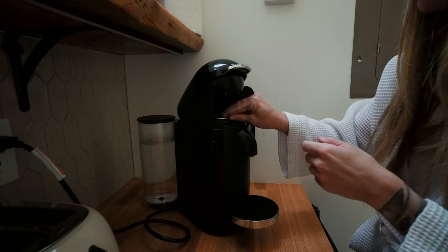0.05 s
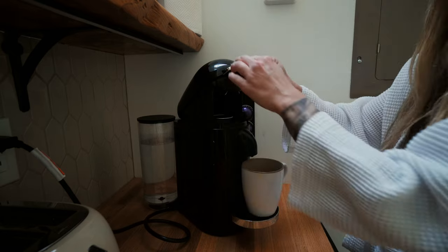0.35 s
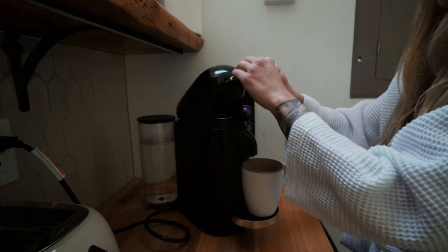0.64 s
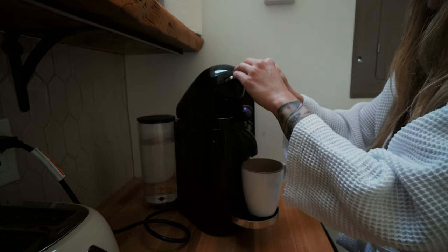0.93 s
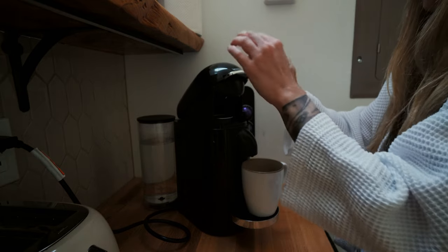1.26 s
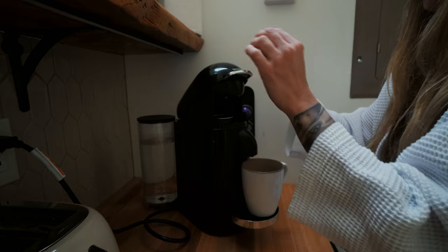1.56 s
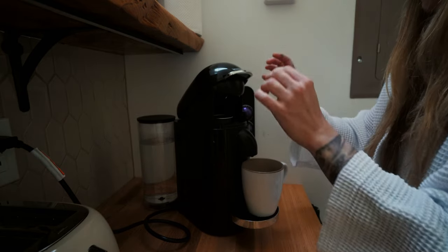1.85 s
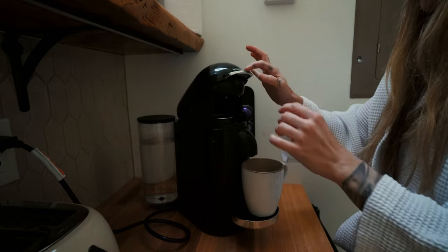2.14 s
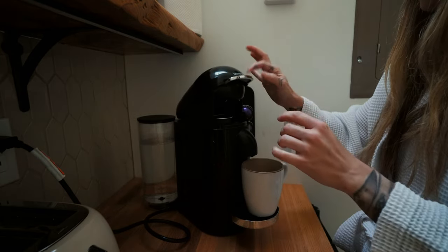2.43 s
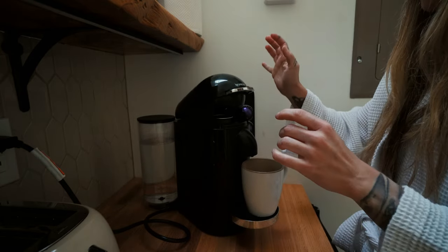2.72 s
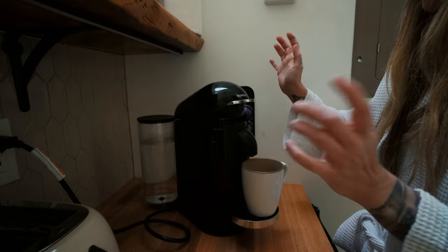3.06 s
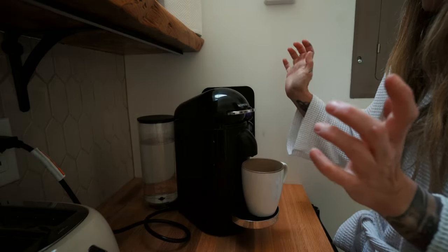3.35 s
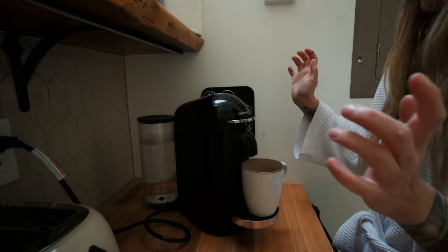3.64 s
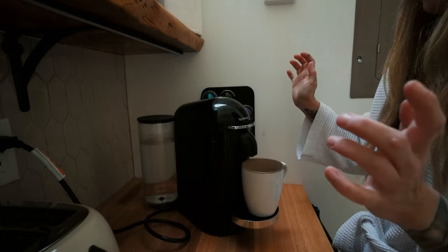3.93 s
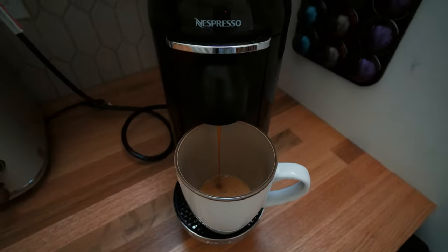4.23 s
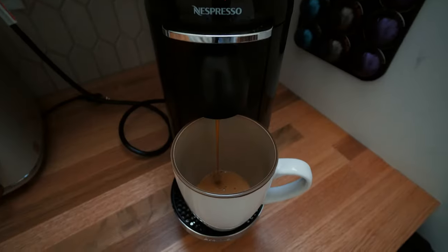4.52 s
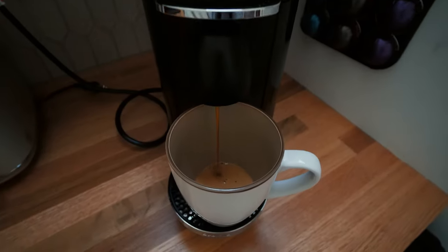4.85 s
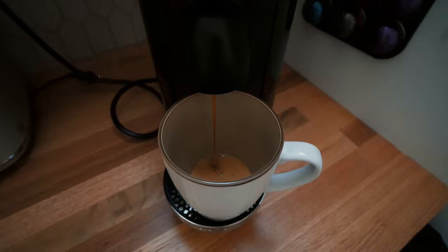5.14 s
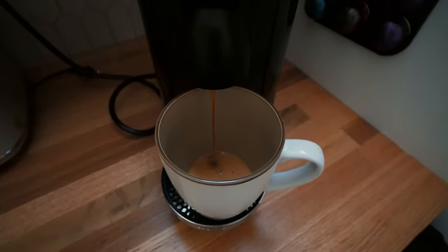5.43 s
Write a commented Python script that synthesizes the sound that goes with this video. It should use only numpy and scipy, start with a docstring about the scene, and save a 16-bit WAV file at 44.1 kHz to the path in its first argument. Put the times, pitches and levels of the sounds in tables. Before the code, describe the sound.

At the start a hollow plastic bin bumps and briefly slides into a capsule coffee machine in a small, slightly echoing kitchen. From 0.4 to 1.1 seconds a sprung lever clicks several times, with dull knocks and two short, soft motor whirs. Faint room noise follows until about 2.3 seconds, when more clicks and knocks start a small gear motor. It whirs and rasps until 3.9 seconds, with light ticks and a thin falling whine. Three sharp plastic latch snaps, the loudest sounds, land at about 3.1, 3.6 and 3.9 seconds, the second with a chattering, ringing spring. At about 4.2 seconds the sound cuts abruptly to close by the spout. The spinning capsule whines at a steady pitch over the hiss of brewing coffee and a faint pump buzz. Tiny drops tick, with larger spits around 5 and 5.3 seconds, and the brewing continues to the end, near 5.7 seconds.

```python
"""A plastic bin bumps and slides into a capsule coffee machine on a small kitchen's wooden counter.
A sprung lever clicks, and head and lever knock dully; a gear motor draws the head shut
and the latches snap home, one with a ringing spring. Then a cut to close by the spout:
the spinning capsule whines over the hiss of the brew, spitting drops and a buzzing pump."""
import sys
import numpy as np
from scipy import signal
from scipy.fft import irfft, next_fast_len
from scipy.io import wavfile
from scipy.ndimage import map_coordinates

SR = 44100
rng = np.random.default_rng(int(sys.argv[2]) if len(sys.argv) > 2 else 0)


def transcribe(u):
    """Save the signal u as a 16-bit wav file named by the first command-line argument.

    u: samples, shape (n,) or (channels, n), limited to [-1, 1]; the rate is SR.
    q: integer samples, one column per channel.
    """
    v = np.clip(np.atleast_2d(u).T, -1, 1)
    q = np.round(v * 32767).astype(np.int16)
    wavfile.write(sys.argv[1], SR, q)


N = 250488
TIME = np.arange(N) / SR
HIT_TIME = TIME[:SR // 2]
FREQS = np.maximum(np.fft.rfftfreq(N, 1 / SR), 1)
COUNTER_HZ = 224.6   # lowest mode of the wood
MOTOR_RELEASE_DB_PER_S, GEAR_RELEASE_DB_PER_S = 110, 193
BREW_START_S = 4.157


def from_db(db):
    """Decibels to gain."""
    return 10 ** (np.asarray(db) / 20)


def rms_one(x):
    """Scale to unit rms."""
    return x / np.sqrt(np.mean(x ** 2) + 1e-20)


def at_hz(points, hz=FREQS):
    """Interpolate a table over log frequency."""
    points_hz, values = np.transpose(points)
    return np.interp(np.log(hz), np.log(points_hz), values)


def colour(points):
    """Broad spectrum of unit power, rolled off below its first point."""
    return rms_one(from_db(at_hz(points)) * np.minimum(FREQS / points[0][0], 1) ** 2)


def resonances(modes):
    """Steep-sided peaks as a spectrum of unit power."""
    power = sum(from_db(db) ** 2 / (1 + ((FREQS - hz) / width) ** 2) ** 2 for hz, width, db in modes)
    return rms_one(np.sqrt(power))


def tilt(db_per_oct):
    """Spectral tilt about 1600 Hz, flat below 400 Hz."""
    return from_db(db_per_oct * np.log2(np.maximum(FREQS, 400) / 1600))


def rippled(shape, ripple_db, spacing_hz):
    """Many small resonances ripple a spectrum."""
    ripple = map_coordinates(rng.standard_normal(2000), [FREQS / spacing_hz], order=2, mode="wrap")
    return rms_one(shape * from_db(ripple_db * ripple * np.minimum(FREQS / 1500, 1)))


def drift(rate_hz):
    """Smooth random curve, spread about 1."""
    knots = rng.standard_normal(N // 20)
    return map_coordinates(knots, [TIME * rate_hz + 10], order=2, mode="wrap")


def tone(hz):
    """Unit-rms sine on a pitch curve, random phase."""
    cycles = np.cumsum(hz * np.ones(N)) / SR
    return np.sqrt(2) * np.sin(2 * np.pi * (cycles + rng.random()))


def gate(start_s, stop_s, release_db_per_s, swell_db_per_s=0, attack_s=0.024):
    """Envelope of a moving part: attack, sloping hold, release."""
    attack = np.clip((TIME - start_s) / attack_s, 0, 1)
    held_db = swell_db_per_s * np.clip(TIME - start_s, 0, stop_s - start_s)
    return attack * from_db(held_db - release_db_per_s * np.maximum(TIME - stop_s, 0))


def add(out, time_s, sound):
    """Mix a sound in at time_s."""
    start = max(round(time_s * SR), 0)
    out[:, start:start + sound.shape[-1]] += sound[..., :N - start]


# stereo width at the counter (frequency [Hz], side re mid [dB])
FAR_WIDTH = [(60, -54), (380, -22.5), (2380, -12), (15000, -2.5)]
def noise(shape, width=FAR_WIDTH, size=N):
    """Shaped stereo noise, mid at unit rms."""
    padded = next_fast_len(size)
    hz = np.maximum(np.fft.rfftfreq(padded, 1 / SR), 1)
    mid, side = np.exp(2j * np.pi * rng.random((2, len(hz)))) * np.interp(hz, FREQS, shape)
    stereo = irfft(mid + side * from_db(at_hz(width, hz)) * [[1], [-1]], padded)[:, :size]
    return stereo / np.std(stereo.mean(axis=0))


def strike(shape, t60_s, rise_s, tilt_db_per_oct=0, low_hz=130):
    """A struck part, too small to radiate bass: dense modes rise and die together."""
    ring = noise(shape * tilt(tilt_db_per_oct), size=len(HIT_TIME))
    envelope = (1 - np.exp(-HIT_TIME / rise_s)) * from_db(-60 * HIT_TIME / t60_s)
    highpass = signal.butter(2, low_hz, "high", fs=SR, output="sos")
    return rms_one(signal.sosfilt(highpass, ring * envelope)) * np.sqrt(np.mean(envelope ** 2))


# kitchen background (frequency [Hz], level [dB])
ROOM_SPECTRUM = [(55, -24.5), (130, -33.5), (280, -22.5), (550, -8), (1050, -11.5), (2130, -16.5),
                 (6000, -38.5), (15000, -49.5)]
def room_tone(level_db=-60.5):
    """Faint, steady room noise."""
    return from_db(level_db) * noise(colour(ROOM_SPECTRUM))


# kitchen decay (frequency [Hz], T60 [s])
ROOM_DECAY = [(200, 0.7), (15000, 0.43)]
def kitchen_reverb(dry, wet_db=-8, onset_s=0.0061, early_db=6, early_s=0.0096):
    """Diffuse reflections from tiles and shelf; treble dies first."""
    t = TIME[:SR * 3 // 4]
    edges_hz = np.geomspace(100, 17000, 9)
    tail = 0
    for low, high in zip(edges_hz, edges_hz[1:]):
        bandpass = signal.butter(2, [low, high], "band", fs=SR, output="sos")
        band = signal.sosfilt(bandpass, noise(np.ones(len(FREQS)), size=len(t)))
        tail += band * from_db(-60 * t / at_hz(ROOM_DECAY, np.sqrt(low * high)))
    tail *= 1 + from_db(early_db) * np.exp(-t / early_s)   # near corner
    tail = rms_one(tail * np.minimum(t / onset_s, 1) ** 2) / np.sqrt(len(t))
    return dry + from_db(wet_db) * signal.fftconvolve(dry, tail, axes=1)[:, :N]


def motor_strain(start_s=2.96, stop_s=3.27, level_db=-62.5, width_hz=18):
    """The loaded motor shakes the counter at its lowest mode."""
    hum = noise(resonances([(COUNTER_HZ, width_hz, 0)]))
    return from_db(level_db) * gate(start_s, stop_s, MOTOR_RELEASE_DB_PER_S) * hum


# motor whine (time [s], pitch [Hz], level [dB])
WHINE_PATH = [(3.19, 7150, -68), (3.29, 6730, -63), (3.385, 6540, -58.5), (3.46, 6210, -66),
              (3.57, 5720, -65), (3.635, 5470, -67)]
def motor_whine(voices=10, smear_hz=210):
    """A thin, smeared whine sinks as the head presses home."""
    times_s, pitches_hz, levels_db = np.transpose(WHINE_PATH)
    hz = np.interp(TIME, times_s, pitches_hz)
    level = from_db(np.interp(TIME, times_s, levels_db))
    whine = rms_one(sum(drift(smear_hz) * tone(hz) for _ in range(voices)))
    return level * gate(times_s[0], times_s[-1], GEAR_RELEASE_DB_PER_S) * whine


# gear stages (start [s], stop [s], pitch [Hz], level [dB])
MESH_TONES = [(2.545, 2.74, 925, -47.5), (2.54, 3.06, 1975, -52), (2.78, 2.96, 638, -56),
              (2.8, 2.97, 885, -53), (2.909, 3.053, 2605, -55), (3.05, 3.12, 3830, -55)]
def gear_mesh(sag_per_s=0.13, jitter=0.009, flutter_db=3.1):
    """Meshing teeth sing unsteadily and sag as the motor slows."""
    out = 0
    for start_s, stop_s, hz, db in MESH_TONES:
        speed = np.exp(-sag_per_s * np.maximum(TIME - start_s, 0)) * (1 + jitter * drift(240))
        level = from_db(db + flutter_db * drift(110)) * gate(start_s, stop_s, GEAR_RELEASE_DB_PER_S)
        out += level * tone(hz * speed)
    return out


# tooth resonances (frequency [Hz], width [Hz], level [dB])
TOOTH_MODES = [(952, 20, 4), (1950, 140, -2), (2360, 460, 0.5), (2656, 60, 4.5), (3220, 85, -2.5)]
# gears under load (start [s], stop [s], initial level [dB])
GEAR_LOADS = [(0.474, 0.67, -49), (2.376, 2.517, -50), (2.53, 2.739, -46.5)]
def gear_rasp(motor_level, idle_db=-12, swell_db_per_s=13.5, grain_db=3):
    """Plastic teeth rasp, faintly when idle, harder as they carry the head."""
    loaded = sum(from_db(db) * gate(start_s, stop_s, GEAR_RELEASE_DB_PER_S, swell_db_per_s)
                 for start_s, stop_s, db in GEAR_LOADS)
    rasp = np.hypot(loaded, from_db(idle_db) * motor_level) * noise(resonances(TOOTH_MODES))
    return from_db(grain_db * drift(300)) * rasp


# motor whir (frequency [Hz], level [dB])
WHIR_SPECTRUM = [(200, -37), (330, -13.5), (750, -2.5), (1400, -6), (3500, -14.5), (4700, -19),
                 (15000, -50.5)]
# gearbox resonances (frequency [Hz], width [Hz], level [dB])
GEARBOX_PEAKS = [(221, 14, -4), (626, 16.6, 9.5), (3740, 200, -1.5), (7500, 410, -16.5), (8300, 220, -14),
                 (9930, 1030, -21)]
# motor runs (start [s], stop [s], initial level [dB], swell [dB/s], tilt [dB/oct])
MOTOR_RUNS = [(0.471, 0.762, -48.5, -4, 0), (0.858, 1.092, -53.5, 12, -0.5), (2.367, 2.494, -50.5, 25, -1),
              (2.512, 3.18, -47, 0, .5), (3.21, 3.632, -47.5, -10.5, 1), (3.784, 3.894, -39, -12, 3)]
def head_drive(gearbox_db=-8):
    """A small motor whirs through its gearbox and drives the head shut."""
    casing = np.hypot(colour(WHIR_SPECTRUM), from_db(gearbox_db) * resonances(GEARBOX_PEAKS))
    casing = rippled(casing, ripple_db=1.6, spacing_hz=123.3)
    whir, motor_level = 0, 0
    for start_s, stop_s, db, swell_db_per_s, db_per_oct in MOTOR_RUNS:
        level = from_db(db) * gate(start_s, stop_s, MOTOR_RELEASE_DB_PER_S, swell_db_per_s)
        whir += level * noise(casing * tilt(db_per_oct))
        motor_level = np.hypot(motor_level, level)
    return whir + gear_rasp(motor_level) + gear_mesh() + motor_whine() + motor_strain()


# plastic friction (frequency [Hz], level [dB])
RUB_SPECTRUM = [(150, -31.5), (380, -12), (720, -1), (1020, -6), (2800, -14), (3450, -10), (4200, -23),
                (15000, -39.5)]
# bin cavity (frequency [Hz], width [Hz], level [dB])
CAVITY_MODES = [(1328, 89, 4.5), (1720, 170, -3)]
def bin_slide(stop_s=0.362, glide_db=-55.5, bump_db=16.5, bump_fade_s=0.16, grain_db=0.5):
    """The hollow bin's ring dies away after a bump as plastic rubs on."""
    bump = np.exp(-TIME / bump_fade_s)
    rub = noise(rippled(colour(RUB_SPECTRUM), ripple_db=3.0, spacing_hz=128.6))
    cavity = from_db(-5 + 6 * bump) * noise(resonances(CAVITY_MODES))
    level = from_db(glide_db + bump_db * bump - grain_db * drift(123))
    return level * (rub + cavity) * (TIME < stop_s)


# lever click (frequency [Hz], level [dB])
CLICK_SPECTRUM = [(500, -35), (1300, -12), (5000, -4), (6200, -47), (10000, -26), (15500, -31)]
# lever metal (frequency [Hz], width [Hz], level [dB])
METAL_MODES = [(1390, 83, 6.5), (4970, 150, 10), (5300, 540, 8.5), (7320, 310, 3.5), (10340, 220, -2.5)]
# lever clicks (time [s], level [dB], mode pitch [ratio])
LEVER_CLICKS = [(0.44, -43, 0.89), (0.515, -34.5, 0.93), (0.633, -34.5, 0.97), (1.098, -32, 0.95),
                (2.255, -42, 0.97), (2.492, -32, 0.95), (3.558, -41, 1.1), (3.824, -40, 1.1)]
def lever(t60_s=0.064, bounce_s=0.012, bounce_db=-8.5, tail_db=-17):
    """The sprung lever clicks and rebounds once; its lower modes ring on."""
    out = np.zeros((2, N))
    for time_s, db, pitch in LEVER_CLICKS:
        metal = resonances([(hz * pitch, width, level) for hz, width, level in METAL_MODES])
        click = np.hypot(colour(CLICK_SPECTRUM), metal)
        tail = strike(metal, t60_s=0.45, rise_s=0.0033, tilt_db_per_oct=-4)
        add(out, time_s, from_db(db + tail_db) * tail)
        for delay_s, loss_db in ((0, 0), (bounce_s, bounce_db)):
            add(out, time_s + delay_s, from_db(db + loss_db) * strike(click, t60_s, rise_s=0.00035))
    return out


# ticks and knocks (frequency [Hz], level [dB])
CLACK_SPECTRUM = [(200, -50), (380, -11.5), (550, -1), (1200, 0.5), (4800, -10), (6500, -19.5),
                  (15000, -40)]
# linkage ticks (time [s], level [dB], tilt [dB/oct])
LINKAGE_TICKS = [(2.7282, -38.5, 2), (2.871, -47, 15), (2.8913, -44.5, 11), (3.248, -38, 1),
                 (3.4998, -37.5, -1)]
def linkage(t60_s=0.054, rise_s=0.0005):
    """The linkage ticks lightly as the head travels."""
    out = np.zeros((2, N))
    for time_s, db, db_per_oct in LINKAGE_TICKS:
        add(out, time_s, from_db(db) * strike(colour(CLACK_SPECTRUM), t60_s, rise_s, db_per_oct))
    return out


# head and lever knocks (time [s], level [dB], tilt [dB/oct], body [Hz], body [dB], counter [dB])
KNOCK_HITS = [(0.498, -38.5, -4, 534, -74, -55.5), (.664, -26, 0.7, 511, -39, -59.5),
              (1.139, -42, -3, 480, -54, -76), (2.282, -43.5, -1.5, 494, -53.5, -74),
              (2.405, -31.5, -3, 467, -31, -57), (2.505, -30, 0, 518, -39, -51),
              (3.894, -27, -4.5, 411, -42.5, -52)]
def knocks(t60_s=0.12, rise_s=0.00031):
    """Heavy parts meet with a dull clack."""
    out = np.zeros((2, N))
    for time_s, db, db_per_oct, *_ in KNOCK_HITS:
        add(out, time_s, from_db(db) * strike(colour(CLACK_SPECTRUM), t60_s, rise_s, db_per_oct))
    return out


def body_boom(swell_s=0.027, t60_s=0.12):
    """Hollow body and counter take up each knock and boom briefly."""
    out = np.zeros((2, N))
    envelope = (1 - np.exp(-(HIT_TIME / swell_s) ** 2)) * from_db(-60 * HIT_TIME / t60_s)
    for time_s, _, _, body_hz, body_db, counter_db in KNOCK_HITS:
        body = from_db(body_db) * np.sin(2 * np.pi * body_hz * HIT_TIME)
        counter = from_db(counter_db) * np.sin(2 * np.pi * COUNTER_HZ * HIT_TIME)
        add(out, time_s, (body + counter) * envelope / envelope.max())
    return out


# latch spring (frequency [Hz], level [dB])
SPRING_SPECTRUM = [(380, -32), (620, -5), (1100, -8.5), (2300, 1), (3400, -2), (4400, -24), (5800, -39),
                   (6700, -13.5), (8500, -14), (10500, -30.5), (15500, -36)]
# spring bounces (time [s], ring [dB], crack re ring [dB])
SPRING_BOUNCES = [(3.636, -23, 9.5), (3.65, -24.5, 10.5), (3.6636, -31.5, 11.5)]
def latch_spring(housing, housing_db=-4, chatter_db=2.2, chatter_hz=260):
    """The released spring bounces in the housing: sharp cracks, a chattering ring."""
    shape = np.hypot(colour(SPRING_SPECTRUM), from_db(housing_db) * housing)
    cracks, ring = np.zeros((2, 2, N))
    for time_s, db, crack_db in SPRING_BOUNCES:
        crack = strike(shape, t60_s=0.058, rise_s=0.00056, low_hz=350)
        add(cracks, time_s, from_db(db + crack_db) * crack)
        add(ring, time_s, from_db(db) * strike(shape, t60_s=0.59, rise_s=0.0014, low_hz=358))
    return cracks + from_db(chatter_db * drift(chatter_hz)) * ring


# plastic snap (frequency [Hz], level [dB])
SNAP_SPECTRUM = [(200, -27), (550, -17.5), (1200, -0.5), (1600, -1), (3400, -3.5), (4500, -17.5),
                 (13500, -31), (16000, -44)]
# housing resonances (frequency [Hz], width [Hz], level [dB])
HOUSING_MODES = [(417, 16, -2), (792, 16, 9), (1078, 124, 5), (1340, 96, 4.5), (1810, 63, 3),
                 (2270, 200, -4.5), (3080, 290, -10.5)]
# bin and latch snaps (time [s], level [dB], T60 [s], tilt [dB/oct], sheen [dB], counter re snap [dB])
SNAP_HITS = [(0.033, -34, 0.055, 6.5, -30, -48), (2.967, -32.5, 0.064, -0.5, -10, -22),
             (3.124, -11.5, 0.035, 2.5, -0.5, -31), (3.558, -29.5, 0.1, -5.5, -7, -24),
             (3.6364, -9, 0.03, 4, -8, -38.5), (3.879, -6, 0.036, 1, 9, -30.5)]
def latches(rise_s=0.0013, sheen_hz=11200, ring_db=-19, ring_t60_s=0.25):
    """Catches snap into the plastic housing, which rings on; one sets its spring bouncing."""
    out = np.zeros((2, N))
    housing = resonances(HOUSING_MODES)
    plastic = rms_one(np.hypot(colour(SNAP_SPECTRUM), housing))
    sheen_shelf = 1 / (1 + (sheen_hz / FREQS) ** 12)
    for time_s, db, t60_s, db_per_oct, sheen_db, _ in SNAP_HITS:
        snap = strike(plastic * from_db(sheen_db * sheen_shelf), t60_s, rise_s, db_per_oct)
        add(out, time_s, from_db(db) * snap)
        add(out, time_s, from_db(db + ring_db) * strike(housing, ring_t60_s, rise_s))
    return out + latch_spring(housing)


def counter_hum(swell_s=0.0072, t60_s=0.19):
    """Each snap sets the wooden counter humming."""
    out = np.zeros((2, N))
    envelope = (1 - np.exp(-HIT_TIME / swell_s)) * from_db(-60 * HIT_TIME / t60_s)
    hum = envelope * np.sin(2 * np.pi * COUNTER_HZ * HIT_TIME)
    for time_s, db, *_, counter_db in SNAP_HITS:
        add(out, time_s, from_db(db + counter_db) * hum)
    return out


# pump harmonic envelope (frequency [Hz], level [dB])
PUMP_SPECTRUM = [(60, -84), (120, -70), (180, -77.5), (300, -75), (360, -65), (420, -83), (780, -66.5)]
def pump(rate_hz=60.1, harmonics=23, flutter_db=0.5):
    """The pump buzzes at a steady rate; each harmonic wavers in level."""
    return sum(from_db(at_hz(PUMP_SPECTRUM, hz) + flutter_db * drift(29)) * tone(hz)
               for hz in rate_hz * np.arange(1, harmonics + 1))


# spits in the spout (time [s], level [dB])
SPOUT_SPITS = [(4.984, -24.5), (5.325, -23), (5.342, -26.5)]
def spatter(shape, drops_per_s=22, drop_db=-36, spread_db=3):
    """Small drops tick on the collector at random, among a few larger spits."""
    out = np.zeros((2, N))
    drop = strike(shape, t60_s=0.0052, rise_s=0.0001, tilt_db_per_oct=-2.5, low_hz=1500)
    for time_s, db in SPOUT_SPITS:
        add(out, time_s, from_db(db) * drop)
    span_s = TIME[-1] - BREW_START_S
    for when, smallness in rng.random((round(drops_per_s * span_s), 2)):
        db = drop_db - spread_db * np.log(smallness + 0.06)
        add(out, BREW_START_S + when * span_s, from_db(db) * drop)
    return out


# casing tones (frequency [Hz], level [dB])
CASING_TONES = [(2293, -56), (3505, -57), (6090, -56.5)]
# spin harmonics (order [multiple of spin rate], level [dB])
SPIN_HARMONICS = [(12, -40), (18, -53.5), (24, -58.5), (37, -59)]
def spin_whine(spin_hz, flutter_db=1.94, jitter=0.00209):
    """The capsule whines at multiples of its spin; the casing adds steady tones."""
    capsule = sum(from_db(db + flutter_db * drift(32)) * tone(order * spin_hz)
                  for order, db in SPIN_HARMONICS)
    casing = sum(from_db(db + flutter_db * drift(16)) * tone(hz * (1 + jitter * drift(60)))
                 for hz, db in CASING_TONES)
    return capsule + casing


# brew hiss (frequency [Hz], level [dB])
HISS_SPECTRUM = [(130, -38), (200, -30), (440, -24.5), (560, -14.5), (1100, -14), (3200, -16.5),
                 (5500, -14), (6500, -18.5), (16000, -28.5)]
# casing resonances (frequency [Hz], width [Hz], level [dB])
CASING_MODES = [(104, 11, -11.5), (2390, 110, 2.5), (2880, 47, 5), (4630, 76, 2.5), (5900, 33, 7),
                (7220, 150, -3.5)]
# stereo width at the spout (frequency [Hz], side re mid [dB])
NEAR_WIDTH = [(60, -31), (3770, -15.5), (15000, -4.5)]
def brew(mean_hz=67.1, wobble=0.00086, hiss_db=-39.5, swell_db_per_s=1.13, throb_db=1.1, casing_db=-7):
    """The spinning capsule flings coffee at its collector; the hiss throbs once a turn and builds."""
    shape = np.hypot(colour(HISS_SPECTRUM), from_db(casing_db) * resonances(CASING_MODES))
    shape = rippled(shape, ripple_db=1.5, spacing_hz=50.02)
    spin_hz = mean_hz * (1 + wobble * drift(12))
    level_db = hiss_db + swell_db_per_s * (TIME - BREW_START_S) + throb_db * tone(spin_hz)
    hiss = from_db(level_db) * noise(shape, NEAR_WIDTH)
    return hiss + spin_whine(spin_hz) + pump() + spatter(shape)


def scene():
    """The head closes, then a hard cut to the brew."""
    impacts = kitchen_reverb(lever() + knocks() + linkage() + latches())
    closing = impacts + body_boom() + counter_hum() + head_drive() + bin_slide() + room_tone()
    return np.where(TIME < BREW_START_S, closing, brew())


def record(dry):
    """Steep low-pass at 16 kHz."""
    return signal.sosfilt(signal.ellip(10, .1, 80, 16000, fs=SR, output="sos"), dry)


dry = scene()
out = record(dry)
transcribe(out)
```